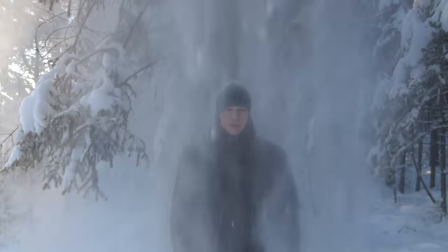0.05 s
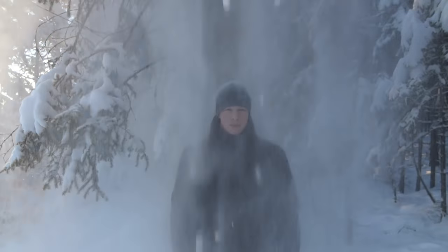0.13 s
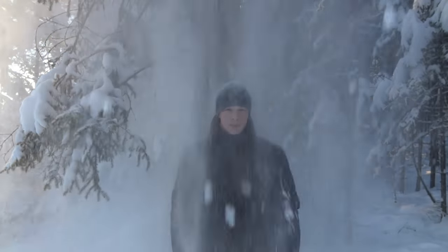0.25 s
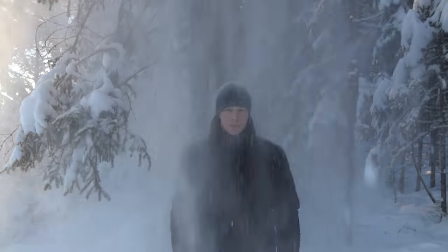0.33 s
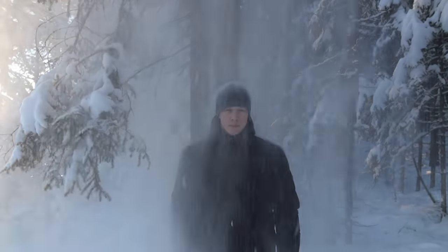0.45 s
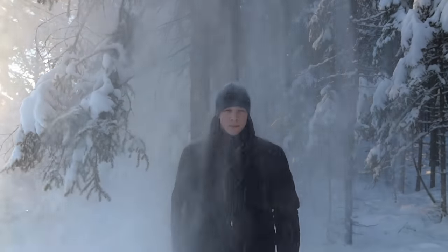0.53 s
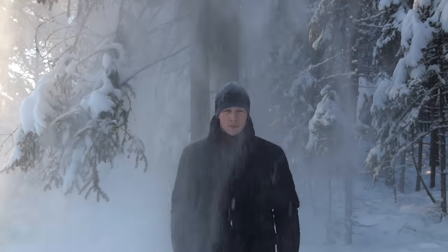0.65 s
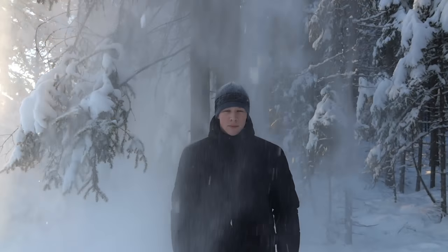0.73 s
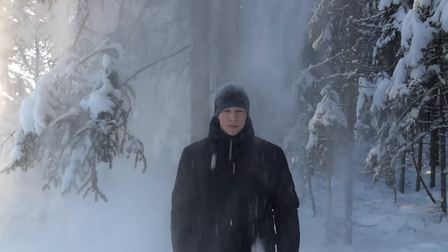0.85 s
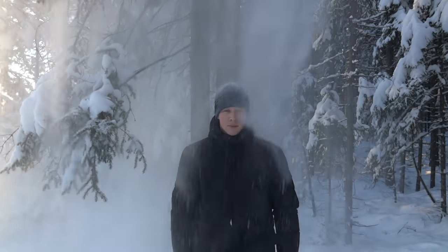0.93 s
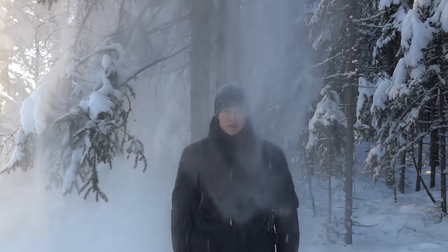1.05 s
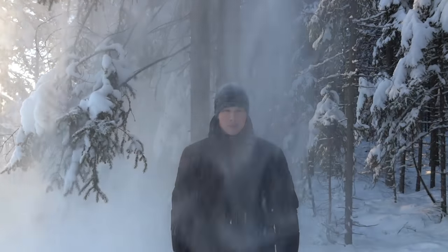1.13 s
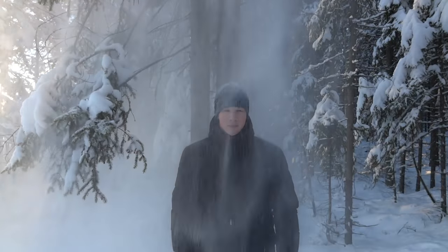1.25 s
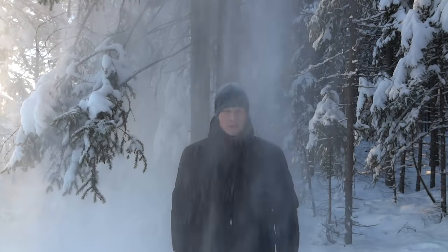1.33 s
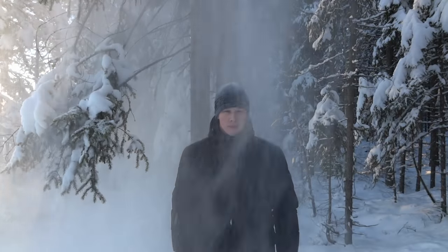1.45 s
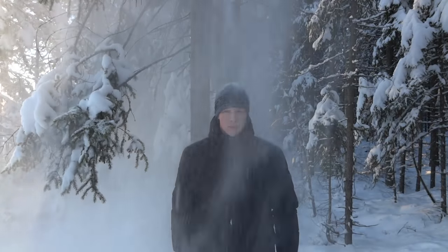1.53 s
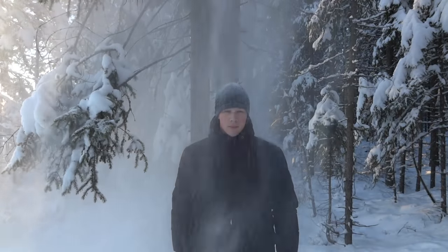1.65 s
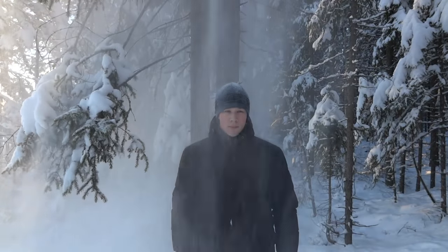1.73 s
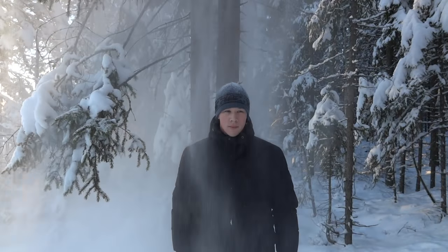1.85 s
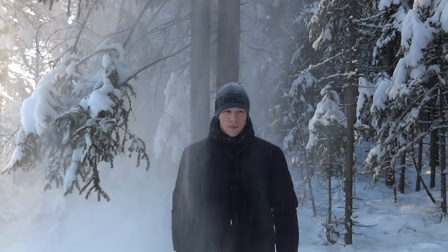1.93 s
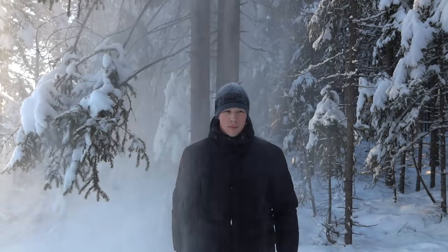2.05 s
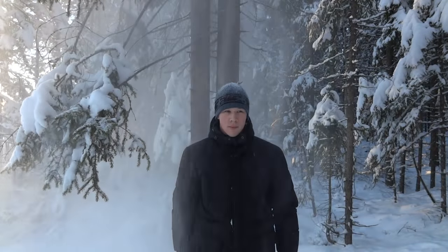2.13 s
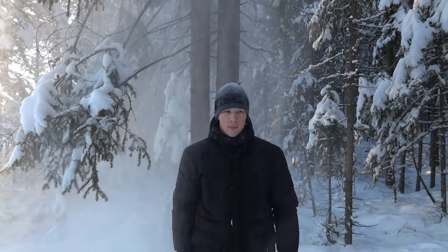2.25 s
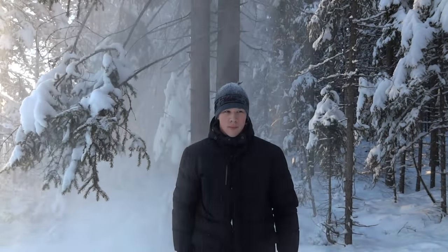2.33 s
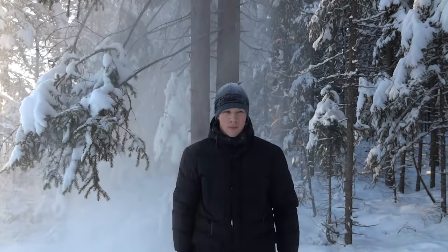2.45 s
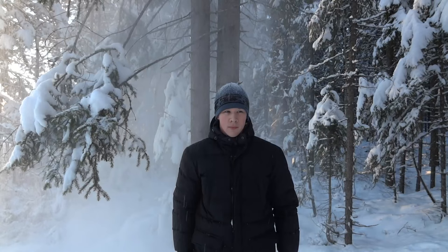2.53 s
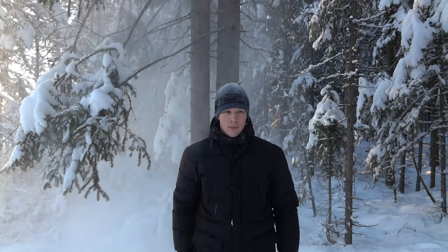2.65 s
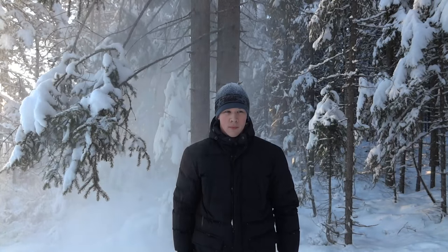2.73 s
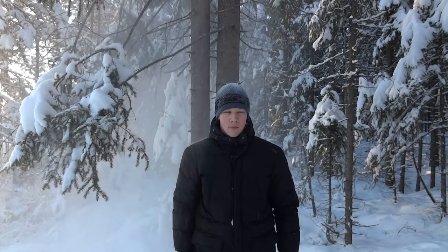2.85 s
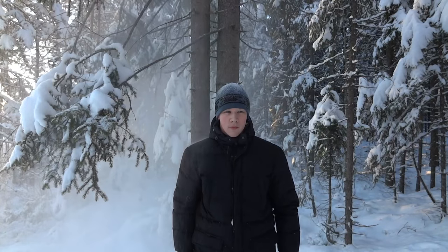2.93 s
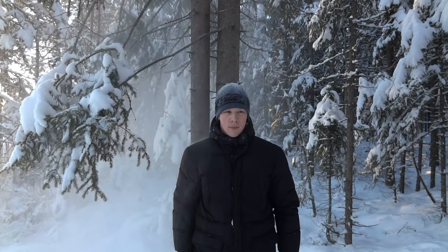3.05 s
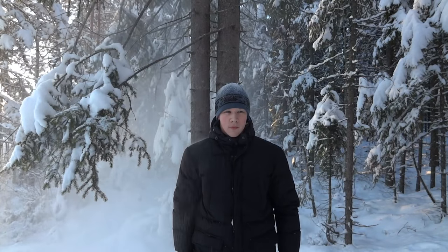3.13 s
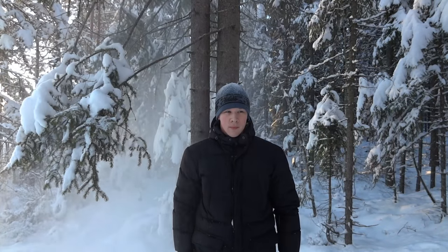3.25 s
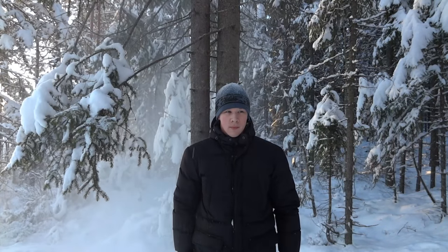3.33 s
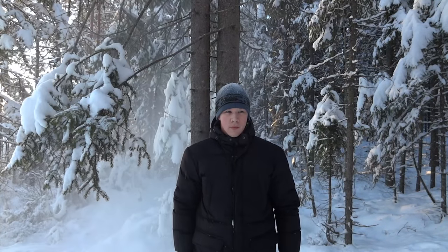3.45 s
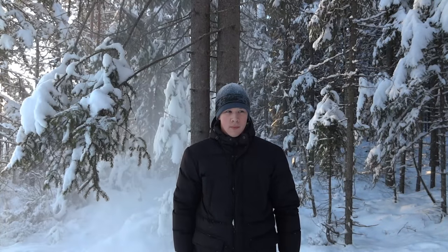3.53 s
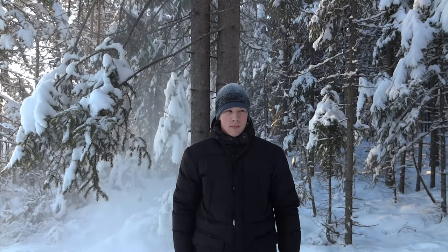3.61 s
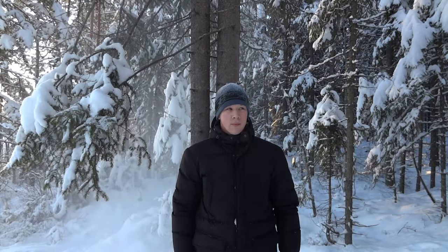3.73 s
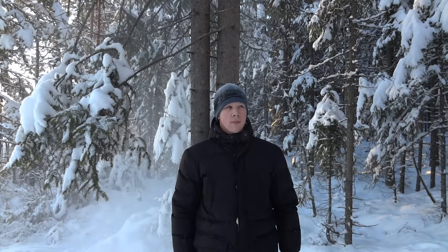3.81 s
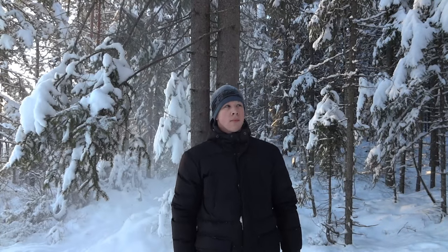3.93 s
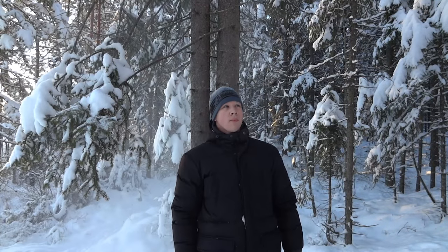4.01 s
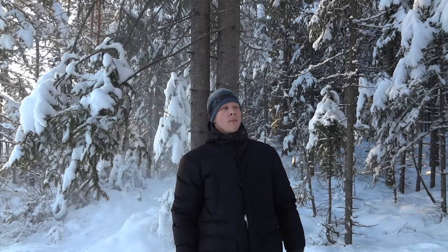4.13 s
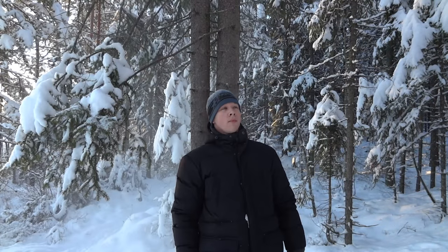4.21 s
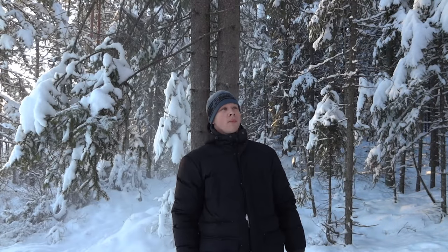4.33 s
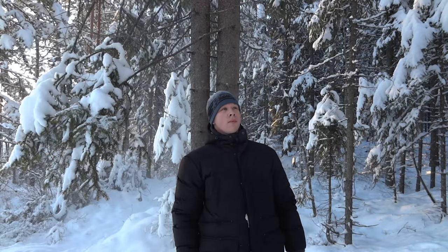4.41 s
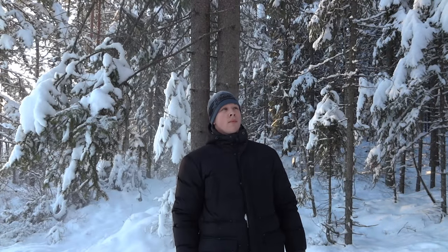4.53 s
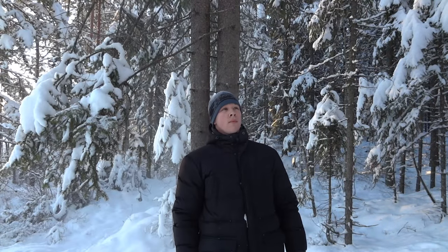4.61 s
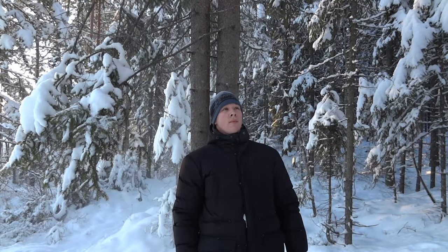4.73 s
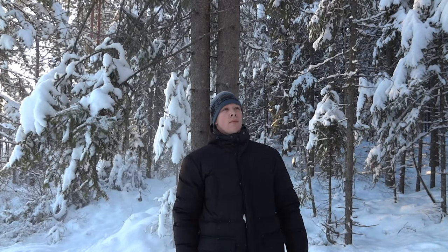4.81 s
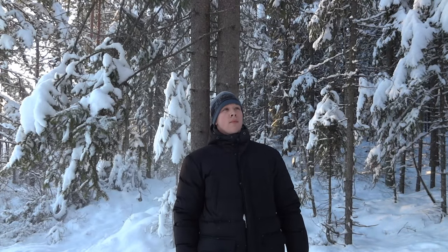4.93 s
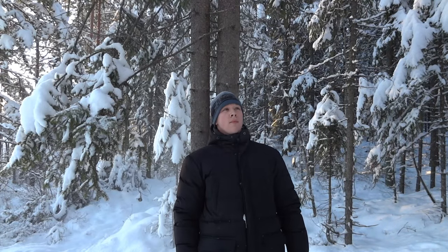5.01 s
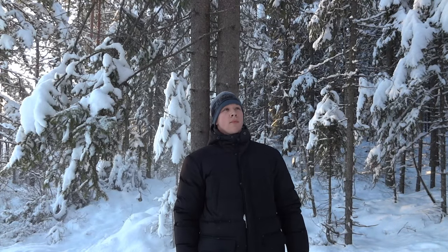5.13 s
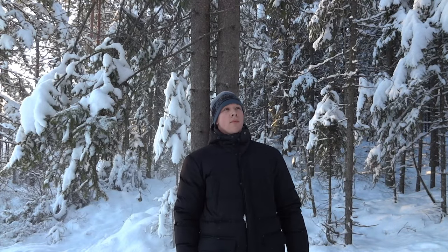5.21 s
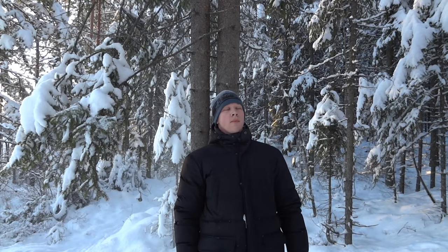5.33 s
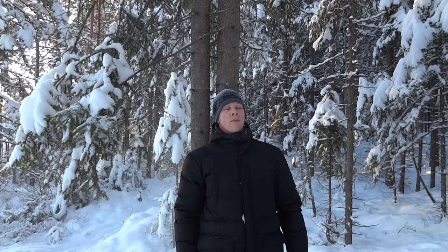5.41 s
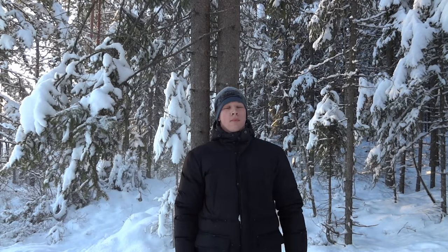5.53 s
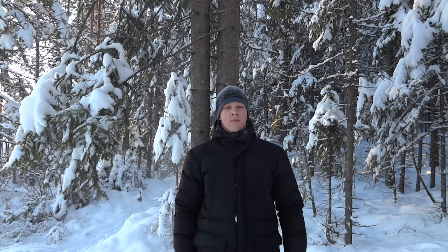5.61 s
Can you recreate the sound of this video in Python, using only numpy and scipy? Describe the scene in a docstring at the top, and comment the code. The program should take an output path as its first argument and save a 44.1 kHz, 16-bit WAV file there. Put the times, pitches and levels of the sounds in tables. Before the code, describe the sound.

From the start, snow pours off a tree onto a padded jacket and the ground, close and near the centre. Fine powder gives a bright, sandy hiss over a dense patter of crumbs. Clumps pat on the cloth, a few heavier wads land with soft, dull thuds, and frozen grains add crisp clicks and tiny zips. The fall is fullest in the first half second and swells again just after 1 second, with a firm pat at about 1.2. From 2 seconds the hiss thins and the pats grow lighter and rarer, with clearer ones near 2.2 and 2.9. After 3 seconds only fine dust and scattered ticks remain. Around 4 seconds a jacket collar gives one short, soft rustle. The last tiny ticks fall at about 5 seconds, leaving a faint, wide, even winter forest hush with no echo.

```python
"""A still winter forest: a load of snow pours off a spruce onto a padded jacket and the ground, then thins.
Countless fine crystals hiss, crumbs patter, clumps pat on the cloth and heavy wads dent the padding.
A few icy lumps zip over the weave, and frozen grains tick on twigs and taut cloth.
As the last grains come down, a collar rustles in the faint hush; the deep snow gives no echo."""
import sys
import numpy as np
from scipy import signal
from scipy.fft import rfft, irfft
from scipy.io import wavfile

SR = 44100
rng = np.random.default_rng(int(sys.argv[2]) if len(sys.argv) > 2 else 0)


def digitize_waveform(pressure):
    """Quantize a signal to 16-bit integers and store it at the path in sys.argv[1].

    Rows of a 2-D input are taken as channels; values are limited to [-1, 1].
    """
    field = np.atleast_2d(pressure).T
    bounded = np.clip(field, -1, 1)
    quanta = np.round(bounded * 32767).astype(np.int16)
    wavfile.write(sys.argv[1], SR, quanta)


N = 250047

# The fall, from full pour to last dust. Each row: time in seconds, powder level in dB, crumb level in dB.
FALL_LEVELS = [(0, -37.5, -42.5), (0.15, -38.5, -41), (0.28, -36.5, -39), (0.38, -39.5, -44),
               (0.5, -40.5, -41), (0.58, -40.3, -43.5), (0.75, -42.5, -43.5), (0.86, -41.5, -44),
               (1.05, -38.5, -42.5), (1.24, -40, -45.5), (1.42, -41.5, -45), (1.62, -42, -49.5),
               (1.79, -42.5, -52.5), (2.0, -46, -50.5), (2.1, -46, -53.5), (2.22, -48.5, -56),
               (2.34, -48.5, -58.5), (2.52, -50.5, -56), (2.62, -51, -62), (2.78, -52, -59.5),
               (3.0, -53, -64), (3.1, -55, -70.5), (3.2, -56.2, -66), (3.26, -58, -78), (3.42, -60.5, -84),
               (3.62, -63.5, -75), (3.8, -63, -69.5), (4.27, -68, -72.5), (4.6, -72.5, -82)]
# Tone of the air, powder, crumbs and rubbing cloth. Each row: frequency in Hz, level in dB.
FOREST_EQ = [(20, -35), (60, -22), (120, -9), (260, -1), (450, 0), (800, -1), (1500, -4), (3000, -6),
             (7000, -9), (12000, -7.5), (16000, -9.5)]
POWDER_EQ = [(60, -36.5), (200, -36.5), (500, -15), (900, -14), (1800, -9.5), (3000, -8), (5000, -6.5),
             (7500, -5), (10000, -1), (12500, 1), (14500, -1), (16000, -5.5)]
CRUMB_EQ = [(40, -46), (120, -39), (170, -29.5), (290, -15.5), (450, -5), (650, 2), (1000, 2.5),
            (1700, 1.8), (2400, 4.5), (3050, 6), (4000, 3.5), (5500, -1), (9000, -3.5), (16000, -11)]
CLOTH_EQ = [(100, -41), (300, -9), (450, 1), (900, 1), (1400, -4.5), (2000, -4), (3000, -0.5), (4600, 0.5),
            (7000, -4.5), (8600, 2), (11000, 0), (16000, -7.5)]
# Stereo width of the hush and the snow: wide lows and mids, centred top.
# Each row: frequency in Hz, side-channel gain in dB.
FOREST_WIDTH = [(60, 9), (110, -8), (200, -8.5), (380, 0.5), (700, 4.5), (1290, 5.5), (2380, 4),
                (4400, -12.5), (8120, -28), (15000, -34)]
SNOW_WIDTH = [(60, -10), (250, -9), (500, -11.5), (1000, -9.5), (2000, -20.5), (4000, -93), (8000, -90)]
# Frozen grains that stand out. Each row: start in seconds, peak level in dB, pitch in Hz.
GRAIN_HITS = [(0.2234, -15, 3700), (.4808, -23, 2700), (0.4955, -14, 5500), (.4973, -22, 3300),
              (.6804, -23, 4100), (.7784, -22, 7000), (.7962, -23, 3600), (1.4757, -30.5, 3300),
              (1.5924, -19.5, 4480), (1.657, -27, 3700), (1.6638, -23, 3000), (1.9717, -31, 2900),
              (2.0273, -27, 3400), (2.0446, -40, 3100), (2.276, -33, 3400), (2.3612, -31, 4100),
              (2.415, -35, 3300), (2.4921, -35, 3900), (2.5135, -34, 3500), (2.5324, -39, 3900),
              (2.5525, -39, 3900), (2.642, -29, 3040), (2.6546, -32, 5500), (2.7082, -35, 3600),
              (2.7315, -35, 3300), (2.7477, -36, 5000), (2.7766, -34, 2800), (2.811, -42, 2800),
              (2.845, -33, 4800), (2.8908, -35, 3700), (2.9166, -30.5, 3630), (2.9194, -35, 3000),
              (2.9516, -48, 4000), (2.994, -41, 3500), (3.011, -37, 3300), (3.1023, -49, 4100),
              (3.134, -38, 3800), (3.1704, -37, 4500), (3.18, -35.5, 3300), (3.2084, -42, 3100),
              (3.2276, -29, 8600), (3.261, -35, 10200), (3.3015, -44, 5500), (3.347, -40, 7000),
              (3.378, -49, 5500), (3.5495, -37, 4340), (3.5776, -42, 12000), (3.6722, -37, 9000),
              (3.931, -35, 11500), (3.9418, -42, 10800), (3.9535, -34.5, 4200), (4.1479, -41.5, 3200),
              (4.177, -37, 9300), (4.2146, -42, 5400), (4.2626, -47, 6000), (4.3284, -46, 6500),
              (4.4497, -47.5, 3500), (4.4503, -39, 10500), (4.7924, -50, 3400), (5.0543, -46, 6500)]
# Close clumps. Each row: start in seconds, level in dB, pitch in Hz (low is big and soft, high is hard).
CLUMP_HITS = [(.118, -23, 2400), (.1625, -24.5, 2200), (.1893, -23.5, 1300), (.2365, -23, 2600),
              (.2477, -27, 1700), (.304, -23.5, 1300), (.4444, -33, 2500), (.47, -27, 1300),
              (.5038, -26, 1700), (.5461, -23, 1600), (.613, -26, 2100), (.672, -25.5, 1600),
              (.7162, -26, 3000), (.723, -29, 1600), (.7445, -29.5, 950), (.7876, -22, 1690),
              (.891, -32, 1500), (.9644, -25, 2210), (1.03, -33, 2200), (1.0858, -21.5, 1600),
              (1.131, -22, 2800), (1.133, -29, 1400), (1.1651, -18, 2100), (1.1669, -24, 2820),
              (1.2025, -27, 1800), (1.2103, -23.5, 2400), (1.355, -26, 2000), (1.3674, -28, 1800),
              (1.383, -31, 950), (1.4914, -33, 1100), (1.5195, -34.5, 1000), (1.5586, -38, 1000),
              (1.574, -40, 1200), (1.616, -34, 800), (1.6366, -36.5, 890), (1.651, -29.5, 1400),
              (1.6724, -26, 2000), (1.8133, -30, 1900), (1.8414, -29.5, 2300), (1.8805, -36, 900),
              (1.8955, -24.5, 1620), (1.9125, -40, 2500), (1.928, -30.5, 2100), (1.974, -32.5, 1100),
              (1.983, -29, 1500), (2.001, -29.5, 2100), (2.0186, -32, 1200), (2.0336, -29, 1500),
              (2.155, -41, 2300), (2.1662, -28, 1170), (2.2157, -29, 1900), (2.2319, -33.5, 1200),
              (2.2403, -31, 2700), (2.2825, -34.5, 2100), (2.2911, -36.5, 1200), (2.3774, -36, 2200),
              (2.4822, -37, 2100), (2.5415, -37.5, 1500), (2.662, -37.5, 2500), (2.752, -42, 1800),
              (2.769, -36, 2800), (2.782, -38, 2000), (2.8, -37.5, 1900), (2.8802, -29.5, 1450),
              (2.9165, -34.5, 2200), (2.9794, -40, 1900), (3.0285, -41, 2400), (3.1802, -41.5, 2000),
              (3.544, -48, 2200), (3.7122, -48, 2800), (3.7523, -50, 2800), (4.2624, -50, 1590),
              (4.336, -52, 1200)]
# Icy lumps skidding on the cloth. Each row: start in seconds, level in dB, pitch in Hz,
# length in seconds, pitch spread as a ratio either way.
ICE_SKIDS = [(0.186, -27.5, 8750, 0.011, 1.87), (.4952, -27.5, 8600, 0.0032, 1.5),
             (0.835, -34, 9900, 0.0093, 1.7), (1.718, -35.5, 12100, 0.0048, 1),
             (2.8446, -36.5, 12200, 0.0026, 1.17), (3.8486, -45, 11800, 0.0042, 1.2),
             (4.338, -56, 11600, 0.004, 1.2)]
# Heavy wads on the padding. Each row: start in seconds, level in dB, pitch in Hz, packing time in seconds.
WAD_HITS = [(.187, -36, 490, 0.0045), (.247, -44.5, 380, 0.0079), (.555, -68, 170, .006),
            (.7878, -38.5, 680, .001), (.848, -48.5, 333, 0.0032), (1.1653, -34, 670, 0.00036),
            (1.983, -48, 650, .001), (2.1662, -37, 724, 0.00058), (2.234, -53, 480, 0.00093),
            (2.2912, -53, 520, .001), (2.67, -55.5, 550, .002), (2.8799, -46, 610, .0004)]
# The collar rubs as the head turns up. Each row: time in seconds, level in dB, rasp pitch in Hz.
COLLAR_RUB = [(3.91, -68, 2500), (3.96, -60.5, 2700), (4.02, -56, 3000), (4.08, -56.5, 4600),
              (4.125, -61, 4300), (4.17, -67, 3500)]


def gain_of(db):
    """Decibels to amplitude."""
    return 10 ** (np.asarray(db) / 20)


def unit_rms(x):
    """Scales to rms 1."""
    return x / np.sqrt(np.mean(x ** 2) + 1e-20)


def follow(curve):
    """Turns timed rows into one automation line per column."""
    times, *columns = np.transpose(curve)
    return [np.interp(np.arange(N) / SR, times, column) for column in columns]


def add(mix, start_s, sound):
    """Drops a sound into the mix."""
    part = mix[max(round(start_s * SR), 0):][:len(sound)]
    part += sound[:len(part)]


def colour(x, eq):
    """Minimum-phase EQ, so that each click starts sharply and rings after."""
    eq_hz, eq_db = np.transpose(eq)
    hz = abs(np.fft.fftfreq(4096, 1 / SR))
    log_gain = np.log(gain_of(np.interp(np.log(hz + 1), np.log(eq_hz + 1), eq_db)))
    response = np.fft.ifft(np.exp(np.conj(signal.hilbert(log_gain)))).real[:2048]
    return signal.oaconvolve(x, response)[:N]


def lowpass(x, hz):
    """Rolls off the top at 24 dB an octave."""
    return irfft(rfft(x) / (1 + (np.fft.rfftfreq(N, 1 / SR) / hz) ** 4), N)


def wander(hz):
    """Random drift of rms 1, mostly slower than hz."""
    return unit_rms(lowpass(rng.standard_normal(N), hz))


def impacts(per_s, spread_db):
    """Random clicks, many small and a few large; the power holds steady whatever the rate."""
    largeness = np.minimum(rng.exponential(1, N), 3.3)
    size = gain_of(spread_db * largeness) * rng.choice([-1, 1], N)
    lands = rng.random(N) < per_s / SR
    return unit_rms(size * lands / np.sqrt(per_s))


def widen(mid, side, width_eq):
    """Mid-side stereo: wide lows and mids, centred top."""
    side = colour(side, width_eq)
    return np.array([mid + side, mid - side])


def forest(level_db=-67.2):
    """The faint, even hush of the winter air."""
    return gain_of(level_db) * unit_rms(colour(rng.standard_normal(N), FOREST_EQ))


def powder(level_db, trim_db=4.5, full_db=-37, dust_db=-52):
    """Fine crystals strike the cloth in uneven veils: a bright, sandy hiss, grainier as it thins."""
    per_s = 26000 * gain_of(0.35 * np.minimum(level_db - full_db, 0))
    grains = unit_rms(colour(impacts(per_s, spread_db=4), POWDER_EQ))
    body = lowpass(grains, hz=7500)
    # below dust_db the hiss loses body, as only the finest dust is left
    hiss = grains - body + body * gain_of(0.23 * np.minimum(level_db - dust_db, 0))
    flutter_db = 0.5 * wander(hz=40)
    return hiss * gain_of(level_db + trim_db + flutter_db)


def crumbs(level_db, trim_db=2.5, full_db=-38):
    """Crumbs of five sizes patter, the larger duller and rarer, parting into single ticks as they thin."""
    hz, edges_hz = np.fft.rfftfreq(N, 1 / SR), np.geomspace(1000, 9000, num=5)
    per_s = 1900 * gain_of(0.6 * (level_db - full_db))
    shares = (edges_hz / np.median(edges_hz)) ** 0.9
    tones = np.array([1 / (1 + (hz / edge) ** 2) / np.sqrt(share) for edge, share in zip(edges_hz, shares)])
    tones /= np.linalg.norm(tones, axis=0)  # the sizes share each band's power
    spectrum = sum(rfft(impacts(per_s * share, spread_db=5)) * tone for share, tone in zip(shares, tones))
    patter = unit_rms(colour(irfft(spectrum, N), CRUMB_EQ))
    bunching_db = 1.64 * wander(hz=60)
    return patter * gain_of(level_db + trim_db + bunching_db)


def sprinkle(powder_db, per_s=50, candidates=300):
    """Lesser frozen grains fall at random, their level riding the powder's: rows for ticks()."""
    when, luck, size, pitch = rng.random((candidates, 4)).T
    db = powder_db[(when * N).astype(int)] + 7.5 + 8 * size ** 2
    hz = 4200 * 2 ** (1.4 * pitch)
    lands = luck < per_s * N / SR / candidates
    return np.column_stack([when * N / SR, db, hz])[lands]


def ticks(rows, width=1.5, splinter_db=-10, splinter_s=0.0011, snap_hz=3100):
    """A frozen grain strikes taut cloth or a twig: a crisp click with a trace of splintering."""
    t, out = np.arange(400) / SR, np.zeros(N)
    for start_s, db, hz in rows:
        splinters = rng.standard_normal(len(t)) * np.exp(-t / splinter_s)
        force = (t == 0) + gain_of(splinter_db) * splinters / np.linalg.norm(splinters)
        band = signal.butter(1, [hz / width, min(hz * width, 0.4 * SR)], "band", fs=SR)
        skirts = signal.butter(1, [hz / 6, min(hz * 3, 0.45 * SR)], "band", fs=SR)
        click = signal.lfilter(*skirts, signal.lfilter(*band, force))
        # grains pitched near the cloth's own note set off a brief snap
        cloth_note = signal.iirpeak(snap_hz * (1 + 0.04 * rng.standard_normal()), Q=5, fs=SR)
        snap_db = 3 - 40 * abs(np.log2(hz / snap_hz))
        tick = click + gain_of(snap_db) * signal.lfilter(*cloth_note, click)
        add(out, start_s, gain_of(db) * tick / abs(tick).max())
    return out


def shower(crumbs_db, full_db=-40, spent_db=28.5, candidates=300):
    """Lesser clumps fall at random, rarer, lighter and higher as the patter dies: rows for clumps()."""
    when, luck, size, pitch = rng.random((candidates, 4)).T
    lost_db = full_db - crumbs_db[(when * N).astype(int)]
    per_s = 16 * gain_of(-0.23 * lost_db) * (lost_db < spent_db)
    lands = luck < per_s * N / SR / candidates
    db = -32 - 0.18 * lost_db - 1.5 * (2 * size - 1)
    hz = 1130 * 2 ** (1.4 * lost_db + 0.28 * (2 * pitch - 1))
    return np.column_stack([when * N / SR, db, np.minimum(hz, SR / 4)])[lands]


def clumps(rows, crumble_db=-7, crumble_s=0.0012):
    """A clump gives the cloth one push and breaks into grains; softer ones push slower and sound duller."""
    t, out = np.arange(900) / SR, np.zeros(N)
    noise = rng.standard_normal(N + len(t))
    for start_s, db, hz in rows:
        grains = noise[round(start_s * SR):][:len(t)] * np.exp(-t / crumble_s)
        force = (t == 0) + gain_of(crumble_db) * grains / np.linalg.norm(grains)
        softness = signal.butter(2, [hz / 5.3, min(hz * 1.6, 0.45 * SR)], "band", fs=SR)
        pat = colour(signal.lfilter(*softness, force), CRUMB_EQ)  # same cloth as the crumbs hit
        add(out, start_s, gain_of(db) * pat / abs(pat).max())
    low_cut = signal.butter(2, 260, "high", fs=SR, output="sos")  # too light to give any bass
    return signal.sosfilt(low_cut, out)


def skids(trim_db=1):
    """An icy lump scrapes over the weave for a few milliseconds: a short zip."""
    out = np.zeros(N)
    for start_s, db, hz, length_s, spread in ICE_SKIDS:
        samples, width = round(length_s * SR), max(spread, 1.05)
        scrape = rng.standard_normal(2048)[:samples] * signal.windows.tukey(samples, 0.5)
        band = signal.butter(3, [hz / width, min(hz * width, 0.45 * SR)], "band", fs=SR)
        skid = signal.lfilter(*band, np.pad(scrape, (0, samples)))
        add(out, start_s, gain_of(db + trim_db) * skid * np.sqrt(samples) / np.linalg.norm(skid))
    return out


def thuds(width=1.62, cycles=1.44, packing_db=-20):
    """A heavy wad dents the padding, and a loose one goes on packing down briefly: a soft, dull pat."""
    t, out = np.arange(SR // 10) / SR, np.zeros(N)
    for start_s, db, hz, packing_s in WAD_HITS:
        packing = gain_of(packing_db) * rng.standard_normal(len(t)) * np.exp(-t / packing_s)
        band = signal.butter(3, [hz / width, hz * width], "band", fs=SR, output="sos")
        pat = signal.sosfilt(band, (t == 0) + packing)
        add(out, start_s, gain_of(db) * pat * np.sqrt(SR * cycles / hz) / np.linalg.norm(pat))
    return out


def collar(catches_per_s=7000, rasp_db=-8, rasp_width_hz=700):
    """The weave catches and slips unevenly: a soft swish whose rasp rises as the cloth slides faster."""
    t = np.arange(N) / SR
    db, hz = follow(COLLAR_RUB)
    rubbing = gain_of(db + wander(hz=70)) * (t > COLLAR_RUB[0][0]) * (t < COLLAR_RUB[-1][0])
    swish = unit_rms(colour(impacts(catches_per_s, spread_db=3.5), CLOTH_EQ))
    catches = impacts(catches_per_s, spread_db=3.5)
    # a resonance that glides with the rasp pitch
    carrier = np.exp(2j * np.pi * np.cumsum(hz) / SR)
    pole = np.exp(-np.pi * rasp_width_hz / SR)
    rasp = (carrier * signal.lfilter([1 - pole], [1, -pole], catches / carrier + 1e-18)).real
    return rubbing * (swish + gain_of(rasp_db) * unit_rms(rasp))


def scene(settling_db_per_s=9):
    """The snow sits near the centre of a wide forest bed; after the pour, the dust fades steadily."""
    settled_db = settling_db_per_s * np.maximum(np.arange(N) / SR - FALL_LEVELS[-1][0], 0)
    powder_db, crumbs_db = follow(FALL_LEVELS) - settled_db
    hush = widen(forest(), forest(), FOREST_WIDTH)
    side = powder(powder_db) + crumbs(crumbs_db)
    mid = powder(powder_db) + crumbs(crumbs_db) + collar()
    soft_hits = clumps(CLUMP_HITS) + clumps(shower(crumbs_db)) + thuds()
    icy_hits = ticks(GRAIN_HITS) + ticks(sprinkle(powder_db)) + skids()
    return widen(mid + soft_hits + icy_hits, side, SNOW_WIDTH) + hush


def record(dry):
    """A steep high cut takes off the very top."""
    high_cut = signal.firwin(511, 15850, window=("kaiser", 9), fs=SR)
    return signal.oaconvolve(dry, high_cut[None], "same")


dry = scene()
out = record(dry)
digitize_waveform(out)
```